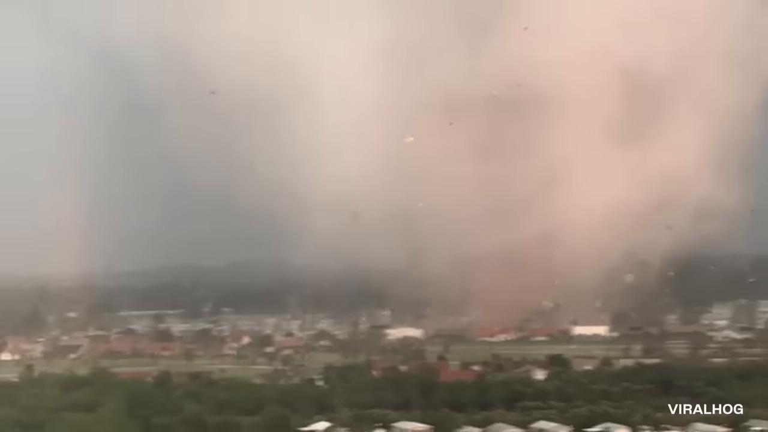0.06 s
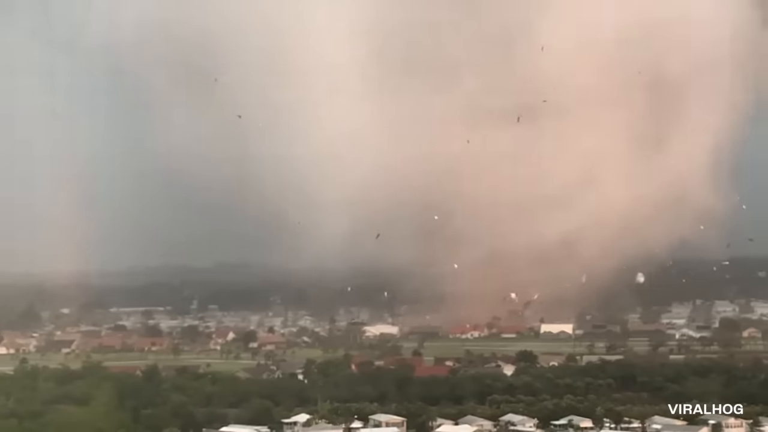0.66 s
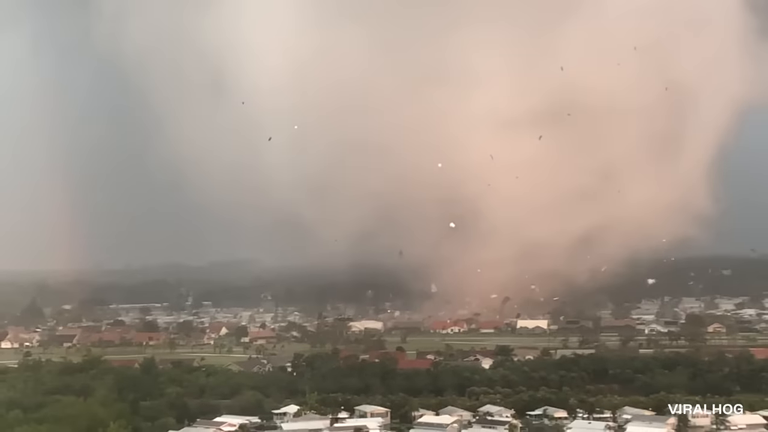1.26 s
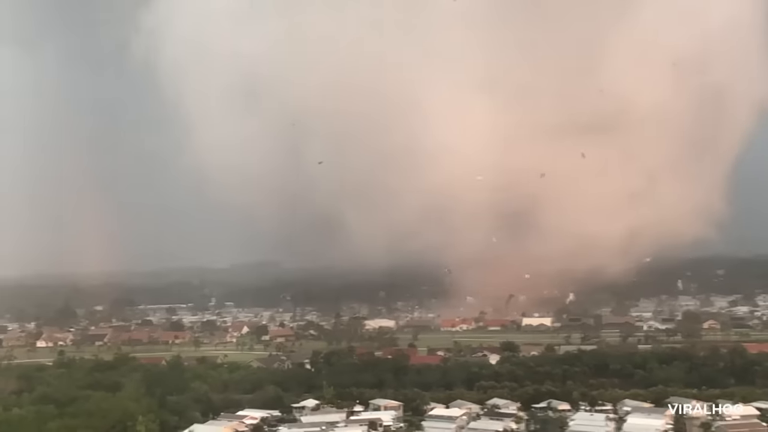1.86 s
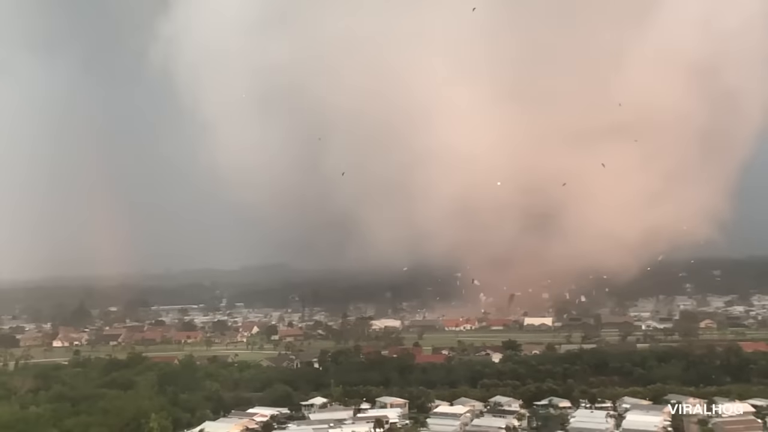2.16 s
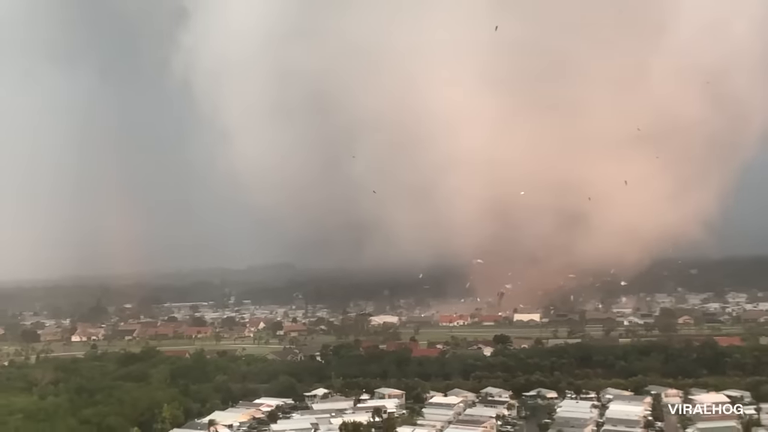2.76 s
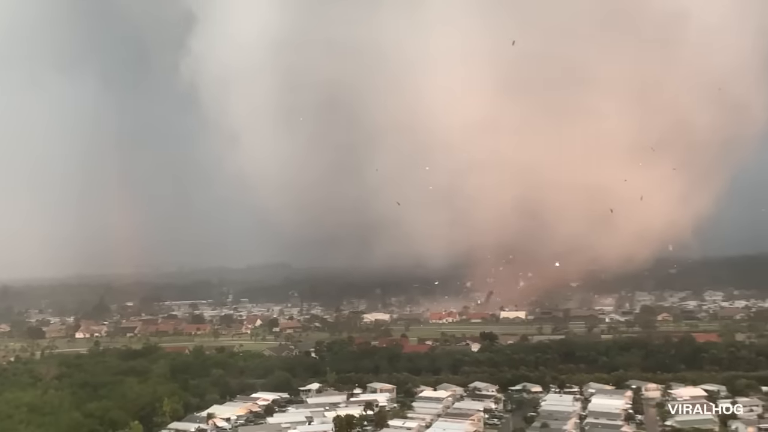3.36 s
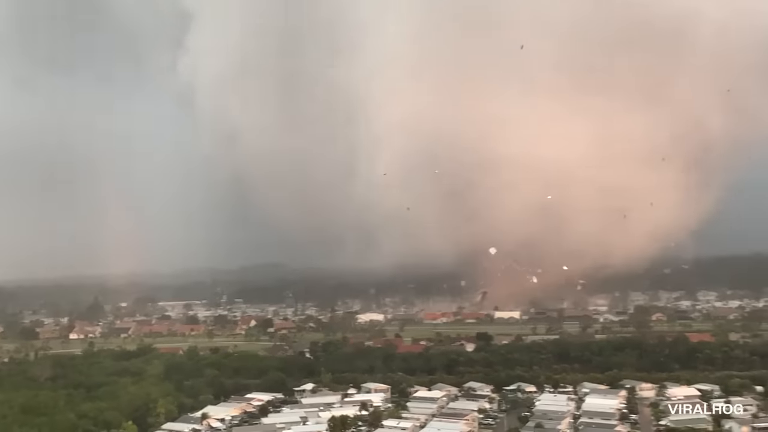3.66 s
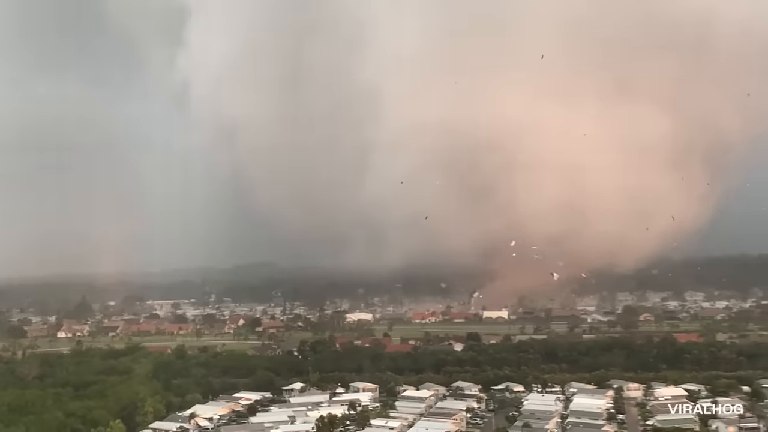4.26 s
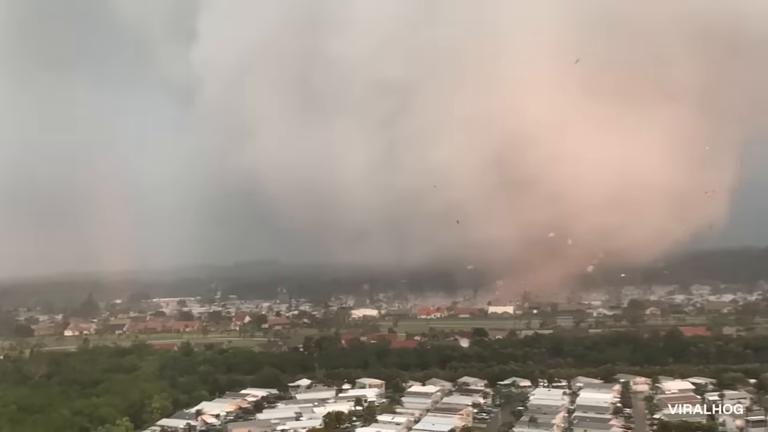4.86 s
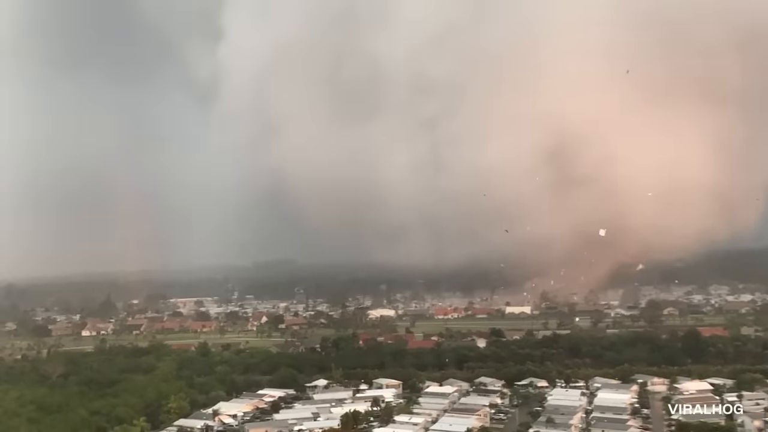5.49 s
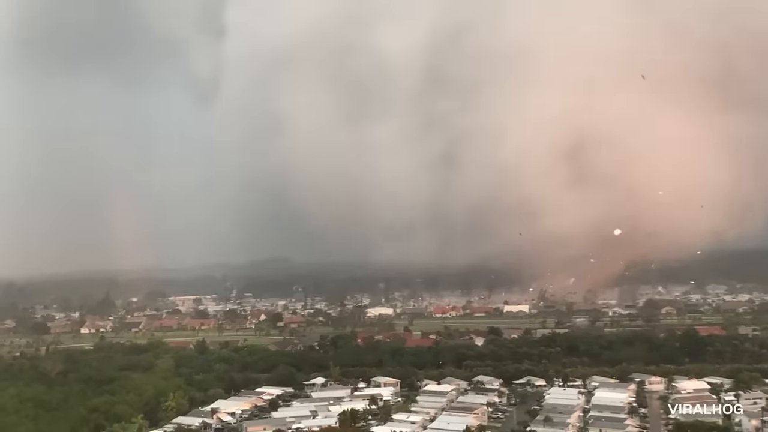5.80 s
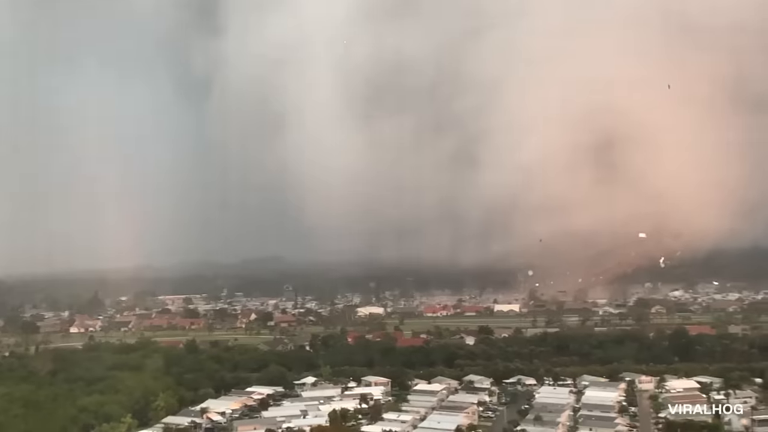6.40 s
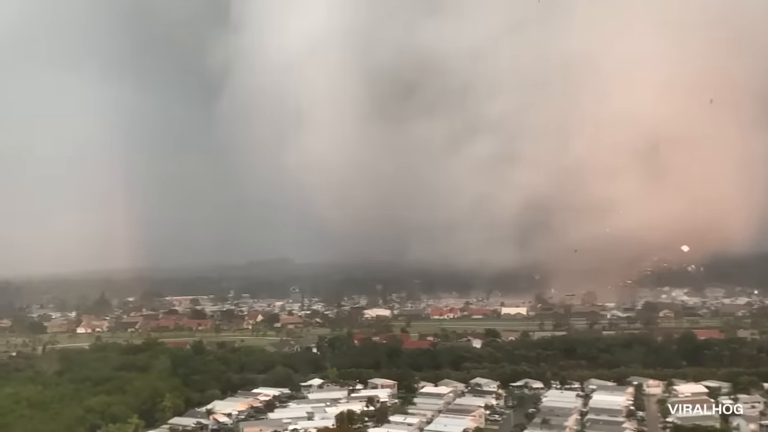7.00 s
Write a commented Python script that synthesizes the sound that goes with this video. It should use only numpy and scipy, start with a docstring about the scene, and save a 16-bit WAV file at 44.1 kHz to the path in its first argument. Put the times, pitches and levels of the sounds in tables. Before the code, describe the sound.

A deep, dense wind rumble fills the microphone, broken by close flapping, thumping and whipping gusts. It starts hard, eases unevenly for a few seconds, then builds again to a late surge before dropping a little. Heard from a balcony above a town, a tornado roars faintly in the distance, with soft rustling trees and occasional small ticks of grit nearby.

```python
"""A tornado passes a town, heard from a high balcony. A hard gust opens: eddies slap, whip and
thump the microphone port over a deep rumble and a flutter of small eddies. From about 1 s the slaps
thin out, with brief calms between. From 4.5 s gusts and slaps crowd in again; the steady wind
peaks near 6.3 s, then drops. Behind it all the far funnel roars, trees hiss and blown grit ticks."""
import sys
import numpy as np
from scipy import signal
from scipy.fft import rfft, irfft, next_fast_len
from scipy.io import wavfile
from scipy.ndimage import uniform_filter1d, minimum_filter1d, map_coordinates

SR = 44100
rng = np.random.default_rng(int(sys.argv[2]) if len(sys.argv) > 2 else 0)


def store_pcm(level_fs):
    """Save levels as 16-bit WAV."""
    pcm = np.round(np.clip(level_fs, -1, 1) * 32767).astype(np.int16)
    wavfile.write(sys.argv[1], SR, np.atleast_2d(pcm).T)


N = 314874
TIME_S = np.arange(N) / SR
EVENT_S = np.arange(-SR // 16, SR // 16) / SR  # time axis around one event
PAD = len(EVENT_S)

# Table levels are relative; the functions add trims.
# steady wind (time [s], level [dB])
STEADY_WIND = [(0.0, -29.5), (0.87, -30.5), (1.11, -31), (1.95, -32), (2.44, -32.5), (3.4, -31),
               (3.76, -32), (4.24, -30), (4.71, -30.5), (5.73, -27.5), (5.85, -30.5), (6.08, -28.5),
               (6.35, -22.5), (6.6, -30), (7.14, -36)]
# gusts (start [s], length [s], level [dB], tearing level [dB])
WIND_GUSTS = [(0, 0.058, -19, -27.5), (0.105, 0.11, -38, -35), (0.262, 0.09, -26, -32.5),
              (0.408, 0.039, -36, -35), (0.556, 0.021, -32, -32), (0.697, 0.027, -38.5, -58),
              (0.897, 0.037, -47, -34), (1.041, 0.058, -28.5, -44), (1.163, 0.017, -26, -52),
              (1.241, 0.12, -30.5, -37.5), (1.395, 0.026, -34.5, -40), (1.74, 0.069, -36, -50),
              (2.247, 0.099, -36, -53), (2.373, 0.23, -34.5, -42.5), (2.776, 0.063, -51, -46),
              (3.548, 0.044, -36, -42), (3.744, 0.036, -41, -54), (3.847, 0.047, -28.5, -52),
              (4.503, 0.028, -27.5, -38), (4.542, 0.16, -27, -31.5), (4.73, 0.13, -33, -39.5),
              (4.91, 0.077, -37, -55), (5.133, 0.045, -29.5, -47), (5.2, 0.027, -32, -52),
              (5.275, 0.034, -23, -43), (5.47, 0.061, -52, -57), (5.578, 0.049, -33, -38),
              (5.67, 0.038, -27, -41), (5.765, 0.1, -33, -40.5), (6.052, 0.027, -30, -47),
              (6.23, 0.125, -25, -37), (6.416, 0.11, -29.5, -35.5), (6.669, 0.11, -36, -46),
              (6.815, 0.05, -30, -50), (6.948, 0.079, -39, -56), (7.107, 0.033, -31.5, -53)]
# brief calms (time [s], half-width [s], gain [dB])
WIND_CALMS = [(0.108, 0.01, -4), (0.24, 0.009, -2), (0.8, 0.023, -5), (1.267, .007, -13), (1.5, 0.023, -2),
              (1.6, 0.0067, -9), (1.76, 0.015, -17), (1.824, 0.012, -22), (1.915, 0.0099, -14),
              (2.033, 0.016, -12), (2.15, 0.018, -5), (2.269, 0.009, -9), (2.328, 0.013, -4),
              (2.64, 0.017, -2), (2.73, 0.0065, -2), (2.99, 0.045, -7), (3.16, 0.025, -2.5),
              (3.33, 0.044, -8), (3.42, 0.035, -7), (3.67, 0.028, -4.5), (4.15, 0.083, -1.5),
              (4.8, 0.012, -13), (4.893, .011, -2), (5.07, 0.03, -3), (5.122, .009, -5), (5.41, 0.04, -4.5),
              (6.14, 0.027, -5.5), (6.377, 0.015, -5), (6.57, 0.0092, -11), (6.654, 0.011, -7)]
# rumble swell (time [s], level [dB])
RUMBLE_SWELL = [(0.0, -25), (0.55, -29), (0.59, -32), (0.73, -28), (0.77, -34.5), (0.89, -29.5),
                (1.27, -30.5), (1.29, -27.5), (1.47, -28.5), (1.49, -45), (1.55, -27.5), (1.67, -31.5),
                (2.96, -31), (2.98, -30.5), (3.04, -29.5), (3.18, -36), (3.22, -32), (3.26, -34),
                (3.8, -29.5), (4.24, -34), (4.26, -30), (4.63, -31), (4.67, -25), (4.75, -28), (5.37, -28),
                (5.43, -29.5), (5.47, -28), (5.83, -27), (5.97, -41), (6.01, -30.5), (6.5, -27.5),
                (6.54, -30), (6.98, -27), (7.14, -30.5)]
# hard eddies (time [s], level [dB], flap pitch [Hz], crack re level [dB])
SLAP_EDDIES = [(0.002, -19, 500, -22), (0.024, -15, 760, -20), (0.033, -19, 520, -21),
               (0.056, -19, 380, -18), (0.074, -29, 700, -18), (0.117, -24.5, 900, -24),
               (0.136, -28, 800, -18), (0.178, -16, 533, -32), (0.219, -20.5, 480, -33),
               (0.272, -15.5, 640, -29), (0.31, -12, 430, -33), (0.328, -24, 544, -19),
               (0.346, -27, 600, -29), (0.489, -22.5, 750, -27), (0.561, -22.5, 660, -20.5),
               (0.634, -22.5, 457, -41), (0.905, -23, 740, -23.5), (0.932, -38, 810, -27),
               (1.005, -18.5, 525, -44), (1.064, -26, 426, -32), (1.098, -20, 590, -38),
               (1.179, -22, 440, -38), (1.276, -25, 490, -31), (1.297, -16, 580, -32),
               (1.31, -23, 473, -38), (1.344, -26, 490, -30), (1.403, -18, 460, -42),
               (1.7816, -20, 460, -34), (1.979, -23, 605, -30), (2.284, -18, 433, -44),
               (2.516, -23, 650, -38), (2.562, -22, 600, -22), (3.031, -23.5, 475, -50),
               (3.199, -24, 510, -43), (3.548, -24, 645, -23), (3.587, -24, 473, -21),
               (3.863, -21, 400, -44), (3.873, -14, 525, -48), (3.904, -23, 480, -50),
               (3.95, -24, 410, -45), (4.511, -26, 700, -34), (4.554, -22, 705, -29),
               (4.567, -20, 447, -39), (4.571, -18.5, 905, -29), (4.607, -18, 700, -31),
               (4.619, -15, 360, -40), (4.631, -21, 447, -38), (4.647, -12.5, 438, -35),
               (4.658, -22, 750, -35), (4.681, -19.5, 546, -27), (4.766, -26, 950, -28),
               (4.851, -23.5, 800, -21), (5.156, -20, 686, -23), (5.163, -22, 560, -35),
               (5.296, -13, 530, -35), (5.306, -27, 426, -34), (5.471, -20.5, 560, -35),
               (5.574, -26.5, 1300, -17), (5.586, -13.5, 584, -32), (5.591, -18, 553, -43),
               (5.595, -16, 630, -38), (5.616, -19, 450, -45), (5.642, -23, 820, -28),
               (5.6575, -11, 500, -55), (5.684, -18, 630, -35), (5.692, -25, 560, -35),
               (5.712, -23.5, 695, -36), (5.82, -17.5, 490, -48), (5.836, -18, 406, -48),
               (6.245, -18, 596, -22.5), (6.276, -22, 716, -36), (6.289, -21, 517, -36),
               (6.328, -21, 430, -41), (6.347, -17, 540, -38), (6.36, -21, 480, -45),
               (6.402, -24.5, 820, -28), (6.456, -18.5, 427, -33), (6.472, -18.5, 760, -33),
               (6.484, -14, 395, -42), (6.508, -16.5, 520, -24), (6.539, -24, 470, -37),
               (6.693, -15.5, 656, -21), (6.722, -19.5, 613, -29), (6.774, -27, 800, -15),
               (6.824, -19, 640, -17), (6.841, -19.5, 680, -28), (6.948, -20, 560, -23)]
# large eddies (time [s], level [dB], pitch [Hz])
THUMP_EDDIES = [(0.014, -12, 133), (0.071, -22.5, 170), (0.176, -21, 102), (0.221, -24, 140),
                (0.284, -16.5, 129), (0.447, -18, 161), (0.538, -18, 91), (0.612, -29, 150),
                (0.716, -26, 91.5), (0.905, -24, 79.5), (0.951, -23, 80), (0.995, -25, 170),
                (1.068, -17, 119), (1.138, -22.5, 149), (1.284, -20, 96.5), (1.325, -21, 98),
                (1.569, -21, 85), (1.725, -26, 72), (1.791, -20, 90), (1.862, -22, 170), (1.886, -18, 110),
                (1.999, -22.5, 103), (2.101, -24, 80), (2.215, -23, 97), (2.287, -16.5, 210),
                (2.436, -20.5, 169), (2.466, -26, 85), (2.551, -21, 150), (2.791, -25, 79.6),
                (2.871, -20.5, 152), (2.902, -21, 146), (2.941, -24, 130), (3.038, -20, 95),
                (3.226, -18, 78), (3.385, -24.5, 94), (3.555, -19, 223), (3.596, -19.5, 124),
                (3.759, -22.5, 75), (3.789, -21.5, 151), (3.84, -28, 150), (3.88, -22, 195),
                (3.906, -23, 155), (3.956, -22, 180), (4.01, -22, 149), (4.423, -26, 149),
                (4.511, -14.5, 215), (4.62, -13.5, 240), (4.667, -23, 110), (4.703, -18, 168),
                (4.737, -21.5, 140), (4.776, -16, 102), (4.924, -21.5, 160), (4.971, -17, 107),
                (5.152, -22, 90), (5.224, -20, 220), (5.246, -15, 121), (5.283, -14.5, 146),
                (5.478, -23, 152), (5.583, -18, 170), (5.616, -17.5, 169), (5.651, -20, 130),
                (6.01, -23, 152), (6.249, -15.5, 199), (6.294, -22, 141), (6.325, -19.5, 150),
                (6.426, -22.5, 150), (6.445, -16, 135), (6.484, -16.5, 164), (6.593, -26, 160),
                (6.843, -19.5, 168), (6.877, -19, 111), (6.956, -19, 107)]
# sweeping eddies (time [s], level [dB], top pitch [Hz], fall time [s], hiss re level [dB])
WHIP_EDDIES = [(0.045, -20.5, 4500, 0.0027, -17), (0.0553, -17.5, 3500, .0025, -14),
               (2.897, -27.5, 2880, 0.00262, -10.5), (4.7632, -25.5, 2800, .0023, -11),
               (5.2205, -29.5, 3160, .004, -10), (5.5295, -28.5, 2200, 0.00287, -8),
               (6.1656, -25, 1610, 0.0028, -19.5), (6.2634, -20.5, 1910, 0.00296, -20.5)]
# storm (time [s], tree hiss level [dB], fine spray level [dB])
STORM_LEVELS = [(0.0, -51, -60), (0.05, -58.5, -59.5), (0.12, -57.5, -64.5), (0.67, -62, -67.5),
                (1.21, -63, -69.5), (1.99, -62, -73), (2.56, -62.5, -69), (2.84, -61.5, -73),
                (3.2, -62.5, -75), (3.48, -61, -75), (3.58, -59.5, -75.5), (4.06, -59, -72),
                (5.05, -58, -68), (5.49, -57, -68.5), (6.03, -62.5, -72), (6.22, -60.5, -73.5),
                (6.27, -60, -66.5), (6.45, -60, -66.5), (6.7, -57, -67.5), (6.84, -53.5, -71),
                (7.14, -57.5, -67.5)]
# treetop rustle (time [s], level [dB])
RUSTLE_LEVELS = [(0, -72), (0.3, -64), (0.65, -70), (1.18, -71), (1.3, -63.5), (2.7, -63), (3.45, -60.5),
                 (3.58, -55), (3.76, -59), (3.86, -61), (4.4, -59.5), (5.5, -56), (6.05, -63.5),
                 (6.8, -60.5), (7.14, -63)]
# grit impacts (time [s], level [dB])
GRIT_TICKS = [(0.0407, -32), (0.054, -39), (1.476, -50), (4.761, -41), (5.212, -40), (5.2172, -40),
              (5.574, -42), (5.911, -43), (5.954, -46), (6.503, -45)]
# near spectra (frequency [Hz], density [dB])
RUMBLE_SPECTRUM = [(15, -51), (25, -48), (33, -15), (42, -5.5), (55, 1.5), (78, 0.5), (100, -2.5),
                   (140, -6.5), (200, -13), (300, -29.5), (600, -54), (1200, -110)]
FLUTTER_SPECTRUM = [(50, -72), (110, -8), (190, 1), (280, -1), (400, -6), (600, -15.5), (900, -26),
                    (1600, -36.5), (4000, -100)]
RASP_SPECTRUM = [(200, -0.5), (450, 7), (650, 3), (850, 0.5), (1100, 3), (1350, -5.5), (1700, -11.5),
                 (2300, -28), (3300, -34), (6000, -40), (14000, -93)]
CRACK_SPECTRUM = [(300, -37), (800, -7), (1300, 15), (2000, 8), (3000, -7), (5000, -15), (12000, -65)]
CHIRP_HISS_SPECTRUM = [(400, -28), (900, 4), (1500, 2), (2000, -1.5), (2750, -7.5), (3150, -12),
                       (5000, -29), (12000, -62)]
GRIT_SPECTRUM = [(1000, -13), (2200, 10), (3500, 2), (5000, 0.5), (7000, -17), (10000, -61), (15000, -45)]
# far spectra (frequency [Hz], density [dB])
ROAR_SPECTRUM = [(60, -5), (250, 6.5), (500, 5.5), (800, 3.5), (1100, 0.5), (1400, 0.5), (2000, -6),
                 (2800, -17), (4000, -25), (8000, -64)]
HISS_SPECTRUM = [(800, 0), (2000, 10.5), (2800, 3.5), (4200, 6), (5500, 3), (8000, -4), (9500, -7.5),
                 (12000, -43), (16000, -58)]
RUSTLE_SPECTRUM = [(1500, -28), (2200, 1.5), (2600, 0.5), (3100, -5), (3700, -11), (5000, -43)]
LEAF_SPECTRUM = [(3500, 2.5), (5200, -9), (6500, 1.5), (8000, -3.5), (9500, -4.5), (13000, -43)]
SPRAY_SPECTRUM = [(3000, -11), (7000, -2), (9500, 2.5), (11000, -1.5), (12400, -4.5), (13200, -7),
                  (14800, -17), (16000, -9)]
# each port feels its own small eddies (frequency [Hz], left-right coherence [0..1])
PORT_COHERENCE = [(660, 1), (780, .975), (960, .92), (1150, .45), (1500, .3), (2000, .05)]
# far sound takes unequal paths to the ports (frequency [Hz], left-right coherence [0..1])
FAR_COHERENCE = [(700, 1), (1000, 1), (1200, 0.91), (2200, 0.46), (3000, 0.56), (4100, 0.73), (4900, 0.43),
                 (5400, 0.63), (6000, 0.55), (7000, 0.51), (8500, 1), (11000, 0.93), (15000, 1)]
# phase from those paths (frequency [Hz], left lead [rad])
FAR_LEAD = [(1000, 0), (1500, .4), (2000, -.8), (2350, -3.3), (3300, -3.9), (3800, -6.4), (4600, -6.1),
            (5300, -3.2), (6000, -.9), (6700, -.2), (8600, -3.1), (11000, -6.2), (13300, -9.4),
            (15500, -12.5)]


def buffeting():
    """Turbulence on the ports: slow rumble, flutter that follows the flow, tearing at the edge."""
    flow_db = airflow_db()
    speed = np.minimum(unit(wobble(45) + 0.81 * wobble(140)), 1)  # shared by all eddy sizes
    rumble = even(noise(RUMBLE_SPECTRUM) * amp(1.13 * speed), samples=2200)
    flutter = even(eddies(FLUTTER_SPECTRUM, per_s=450, smooth=0.41) * amp(5.9 * speed), samples=1700)
    rasp = even(eddies(RASP_SPECTRUM, per_s=400, smooth=0.55) * amp(6.5 * speed), samples=2400)
    tear_db = np.transpose(WIND_GUSTS)[3] - 1.5
    tearing = np.hypot(amp(-49.5 + 0.85 * flow_db), gusts(tear_db))
    small_eddies = amp(-38.5 + 1.1 * flow_db) * flutter + tearing * rasp
    rumble_db = curves(RUMBLE_SWELL)[0] + 0.2 + 0.16 * (flow_db - flow_db.mean()) + 0.45 * calms_db()
    return amp(rumble_db) * rumble + lulls() * small_eddies


def airflow_db(usual_db=-33):
    """Stream strength re its usual value: steady wind, less calms, plus gusts."""
    steady = amp(curves(STEADY_WIND)[0] - 2.5 + calms_db())
    gusting = gusts(np.transpose(WIND_GUSTS)[2] + 4.5)
    return 20 * np.log10(np.hypot(steady, gusting)) - usual_db


def gusts(levels_db, attack_s=0.0034, release_s=0.0081):
    """Joint amplitude of the gusts; each swells, holds and dies away."""
    power = np.zeros(N)
    for (start_s, length_s, *_), db in zip(WIND_GUSTS, levels_db):
        early_s = np.maximum(start_s - TIME_S, 0)
        late_s = np.maximum(TIME_S - start_s - length_s, 0)
        power += (amp(db) * np.exp(-early_s / attack_s - late_s / release_s)) ** 2
    return np.sqrt(power)


def calms_db():
    """The wind briefly drops away."""
    return sum(db * np.exp(-((TIME_S - s) / width_s) ** 2) for s, width_s, db in WIND_CALMS)


def eddies(spectrum, per_s, smooth, lag_cycles=1.1):
    """Random pressure kicks over smooth turbulence; each rolls from small swirls to large."""
    kicks = (rng.random(N) < per_s / SR) * rng.uniform(-1.08, 1, (2, N))
    rolled = filtered(kicks, lambda hz: np.exp(-2j * np.pi * lag_cycles * np.log(hz + 1)))
    return coloured(unit(rolled) + smooth * rng.standard_normal((2, N)), spectrum)


def lulls(depth_db=-9, lead_s=0.007, half_width_s=0.008):
    """Gain dips: the flow lets go of the port just before each slap and whip."""
    dip = np.zeros(N)
    for s, *_ in [*SLAP_EDDIES, *WHIP_EDDIES]:
        near = slice(max(0, round(s * SR) - SR // 20), round(s * SR) + SR // 20)
        dip[near] += np.exp(-((TIME_S[near] - s + lead_s) / half_width_s) ** 2)
    return amp(depth_db * dip)


def slaps(thud_hz=220, thud_lag_s=0.0013, flap_lag_s=0.002):
    """A hard eddy cracks, flaps for about a cycle, then leaves a lower thud and a dying puff."""
    t = EVENT_S - flap_lag_s
    push, puff, crack = np.zeros((3, N + 2 * PAD))
    phases = rng.uniform(-np.pi, np.pi, (len(SLAP_EDDIES), 2))
    for (s, db, flap_hz, crack_db), (flap_rad, thud_rad) in zip(SLAP_EDDIES, phases):
        at = event_span(s)
        push[at] += amp(db - 4.5) * swing(t, flap_hz, flap_rad, cycles=0.85)
        push[at] += amp(db - 9) * swing(t - thud_lag_s, thud_hz, thud_rad, cycles=0.8)
        puff_db = db - 4.5 + 0.39 * crack_db  # a clean slap leaves little turbulence
        puff[at] += amp(puff_db) * burst(t, attack_s=0.002, decay_s=0.0057)
        crack[at] += amp(db + crack_db - 0.5) * burst(t, attack_s=0.0065, decay_s=0.013)
    return unpad(push) + unpad(puff) * noise(RASP_SPECTRUM) + unpad(crack) * noise(CRACK_SPECTRUM)


def thumps(stir_s=0.01):
    """A large eddy pushes the port for a cycle or two and stirs up a brief flutter."""
    push, stir = np.zeros((2, N + 2 * PAD))
    for s, db, hz in THUMP_EDDIES:
        at = event_span(s)
        push[at] += amp(db - 1.5) * swing(EVENT_S, hz, rng.uniform(-np.pi, np.pi), cycles=0.72)
        stir[at] += amp(db - 15) * np.exp(-(EVENT_S / stir_s) ** 2)
    return unpad(push) + unpad(stir) * noise(FLUTTER_SPECTRUM)


def whips(mid_hz=1007, low_hz=350, tilt_db_per_octave=-7.5):
    """An eddy sweeps the port, small swirls first: a falling chirp. Brief midrange hiss surrounds it."""
    push, hiss = np.zeros((2, N + 2 * PAD))
    jitter_rad = np.pad(0.57 * wobble(1200), PAD)
    for s, db, top_hz, fall_s, hiss_db in WHIP_EDDIES:
        at = event_span(s)
        hz = mid_hz * np.exp(np.clip(-EVENT_S / fall_s, -10, 10))
        window = np.exp(-(hz / top_hz) ** 6 - (low_hz / hz) ** 2)
        chirp = np.cos(2 * np.pi * fall_s * hz + rng.uniform(-np.pi, np.pi) + jitter_rad[at])
        push[at] += amp(db + tilt_db_per_octave * np.log2(hz / mid_hz)) * window * chirp
        hiss[at] += amp(db + hiss_db) * burst(EVENT_S + fall_s, attack_s=0.0084, decay_s=0.013)
    return unpad(push) + unpad(hiss) * noise(CHIRP_HISS_SPECTRUM)


def storm():
    """The far funnel roars; nearer trees hiss, more on the right, brighter in strong wind."""
    far = lambda spectrum: noise(spectrum, FAR_COHERENCE, FAR_LEAD)
    hiss_db, spray_db = curves(STORM_LEVELS)
    swell_db = hiss_db - np.mean(hiss_db)
    roar = amp(-47.5 + 0.8 * swell_db + 1.3 * wobble(18)) * far(ROAR_SPECTRUM)
    shake = amp(0.17 * wobble(25) + 2.37 * wobble(300))
    hiss = amp(hiss_db + 2) * far(HISS_SPECTRUM)
    rustle = amp(curves(RUSTLE_LEVELS)[0]) * far(RUSTLE_SPECTRUM)
    leaves = amp(hiss_db + 0.56 * swell_db - 3) * far(LEAF_SPECTRUM)
    spray = amp(spray_db + 6.5 + 0.42 * wobble(31)) * far(SPRAY_SPECTRUM)
    pan = amp([[-1.2], [1.2]])
    return roar + shake * ((hiss + rustle) * pan + leaves) + spray


def grit(rise_s=0.00071):
    """Blown specks tick on the balcony."""
    hits = np.zeros(N)
    for s, db in GRIT_TICKS:
        hits[round(s * SR)] += amp(db + 2.5)
    age = np.arange(SR // 50) / (rise_s * SR)
    return signal.fftconvolve(hits, age * np.exp(1 - age))[:N] * noise(GRIT_SPECTRUM)


def swing(t, hz, phase_rad, cycles):
    """Pressure oscillation centred on t = 0, half-width in cycles."""
    return np.exp(-(t * hz / cycles) ** 2) * np.cos(2 * np.pi * hz * t + phase_rad)


def burst(t, attack_s, decay_s):
    """Exponential rise and fall, peak at t = 0."""
    return np.exp(np.minimum(t / attack_s, -t / decay_s))


def event_span(time_s):
    """Indices of one event in a padded track."""
    return round(time_s * SR) + PAD // 2 + np.arange(PAD)


def unpad(track):
    return track[PAD:PAD + N]


def amp(db):
    return 10 ** (np.asarray(db) / 20)


def unit(x):
    """Scale to rms 1."""
    return x / np.sqrt(np.mean(x ** 2) + 1e-20)


def even(x, samples):
    """Hold the running rms near 1; keep faster flutter."""
    power = uniform_filter1d(uniform_filter1d(np.mean(x ** 2, axis=0), samples), samples)
    return x / np.sqrt(np.abs(power) + 1e-9)


def along(points, hz):
    """Interpolate on a log frequency axis."""
    knots_hz, values = np.transpose(points)
    return np.interp(np.log(hz + 1), np.log(knots_hz + 1), values)


def curves(rows):
    """Per-sample curve of each column after the time."""
    knots_s, *columns = np.transpose(rows)
    return [np.interp(TIME_S, knots_s, column) for column in columns]


def wobble(knots_per_s):
    """Smooth random curve."""
    return map_coordinates(rng.standard_normal(4096), [TIME_S * knots_per_s + 2], mode="mirror")


def filtered(x, response):
    """Apply a frequency response."""
    size = next_fast_len(N + SR // 2)
    return irfft(rfft(x, size) * response(np.fft.rfftfreq(size, 1 / SR)), size)[..., :N]


def coloured(source, spectrum, coherence=PORT_COHERENCE, lead=((0, 0),)):
    """Two signals to a stereo pair of rms 1 with given spectrum, coherence and phase lead."""
    def mid_side_gains(hz):
        angle_rad = np.arccos(np.clip(along(coherence, hz), -1, 1)) / 2
        return amp(along(spectrum, hz)) * [np.cos(angle_rad), np.sin(angle_rad)]
    mid, side = filtered(source, mid_side_gains)
    shift = lambda hz: np.exp(1j * np.outer([0.5, -0.5], along(lead, hz)))
    return unit(filtered(np.array([mid + side, mid - side]), shift))


def noise(spectrum, coherence=PORT_COHERENCE, lead=((0, 0),)):
    """Steady stereo noise of rms 1."""
    return coloured(rng.standard_normal((2, N)), spectrum, coherence, lead)


def limited(x, samples=150, ceiling_db=-11.5):
    """Duck smoothly around each peak above the ceiling."""
    gain = np.minimum(1, amp(ceiling_db) / (np.abs(x).max(axis=0) + 1e-9))
    held = minimum_filter1d(gain, 2 * samples)
    return x * uniform_filter1d(uniform_filter1d(held, samples), samples)


def scene():
    """Wind on the microphone in front of the storm."""
    return buffeting() + thumps() + slaps() + whips() + grit() + storm()


def record(dry):
    """Edge fades, limiter, low-pass."""
    fade_s, cutoff_hz = 0.0015, 15750
    edge_s = np.minimum(TIME_S, TIME_S[::-1])
    fade = np.sin(np.pi / 2 * np.minimum(edge_s / fade_s, 1)) ** 2
    return filtered(limited(dry * fade), lambda hz: hz < cutoff_hz)


dry = scene()
out = record(dry)
store_pcm(out)
```